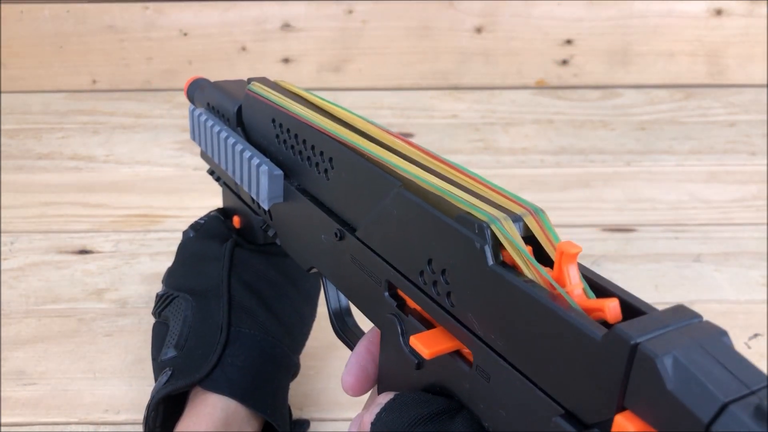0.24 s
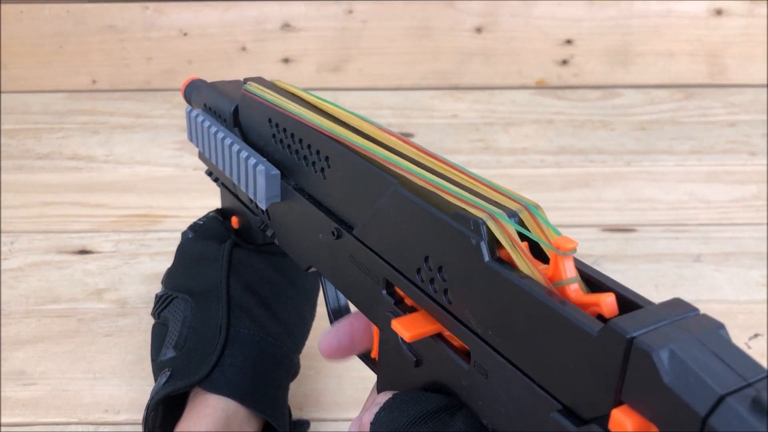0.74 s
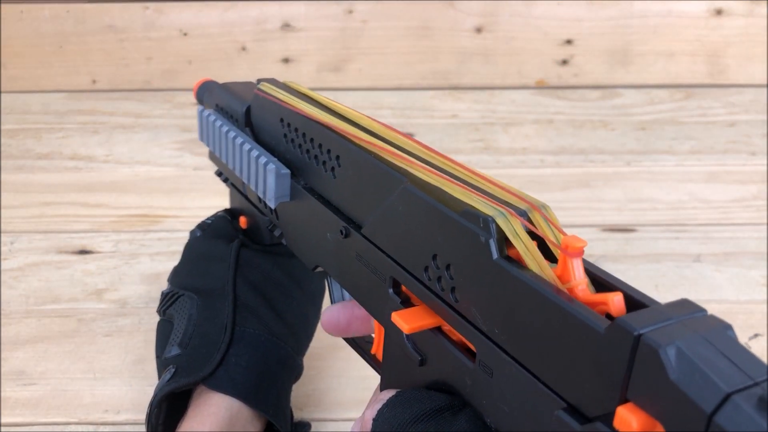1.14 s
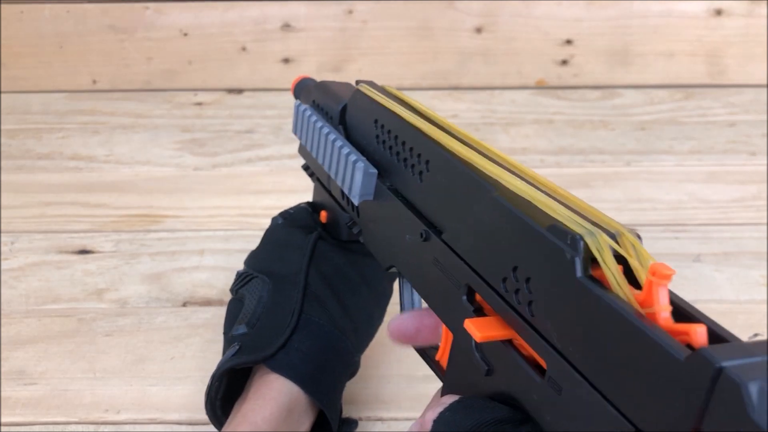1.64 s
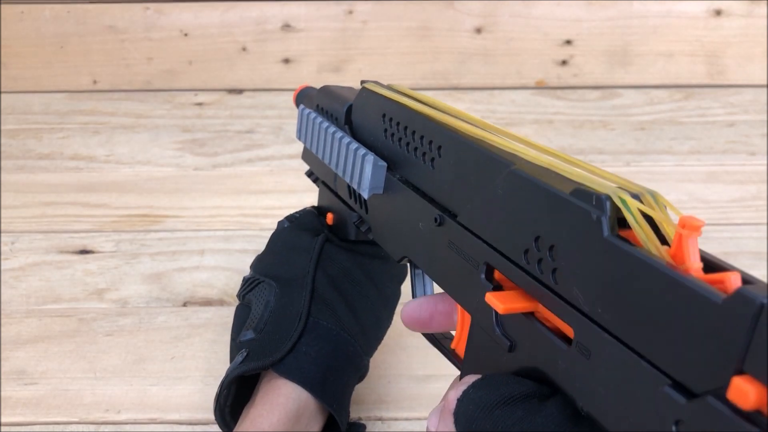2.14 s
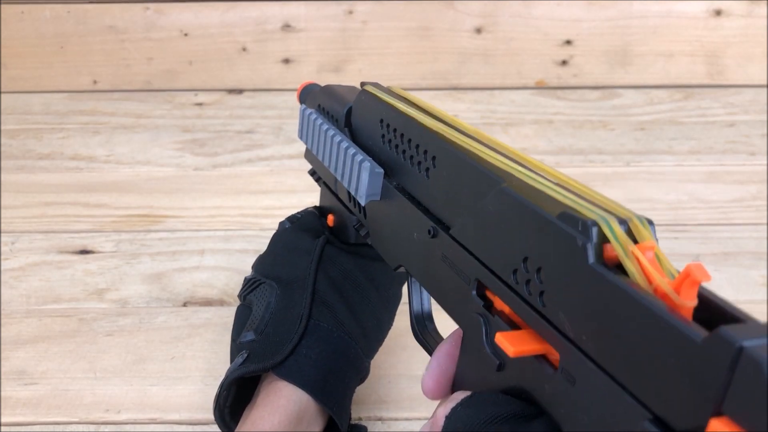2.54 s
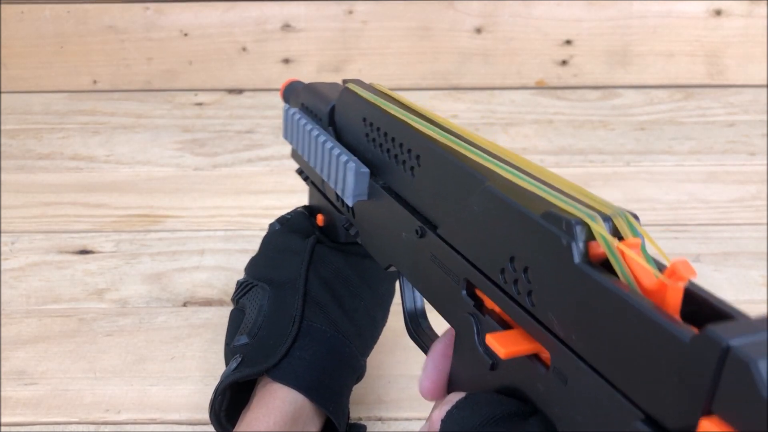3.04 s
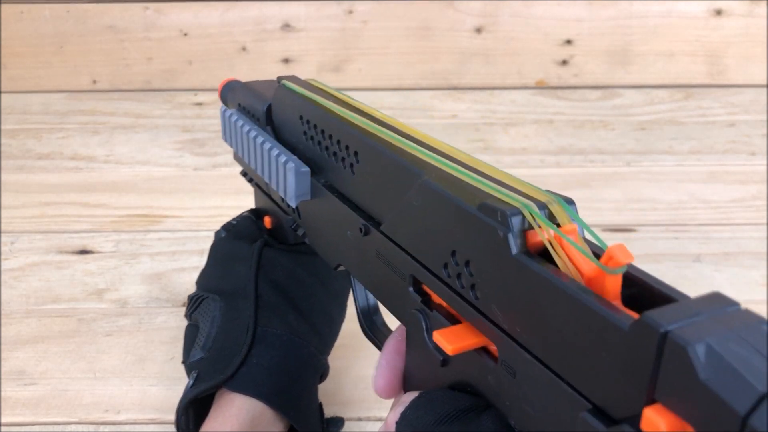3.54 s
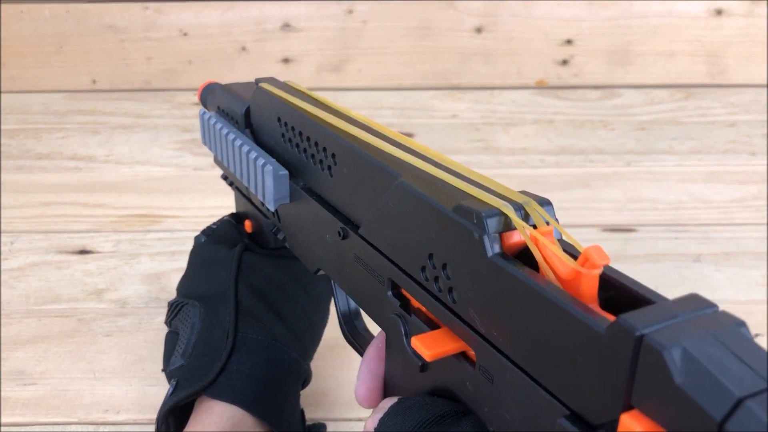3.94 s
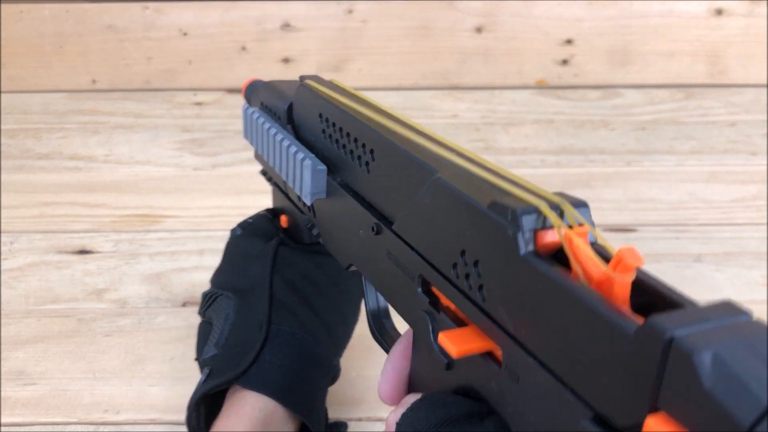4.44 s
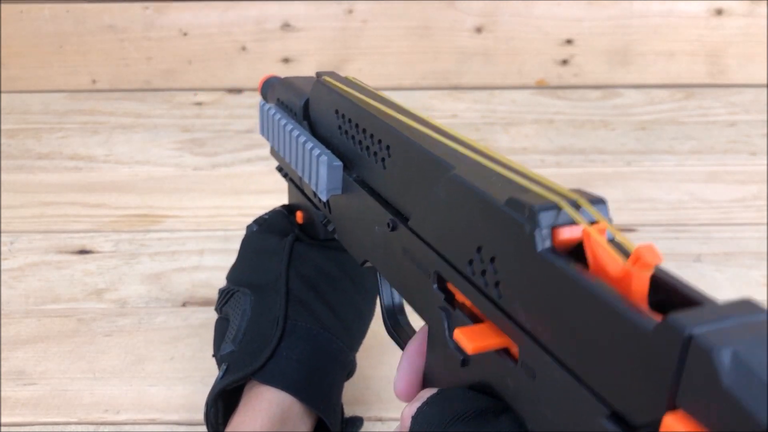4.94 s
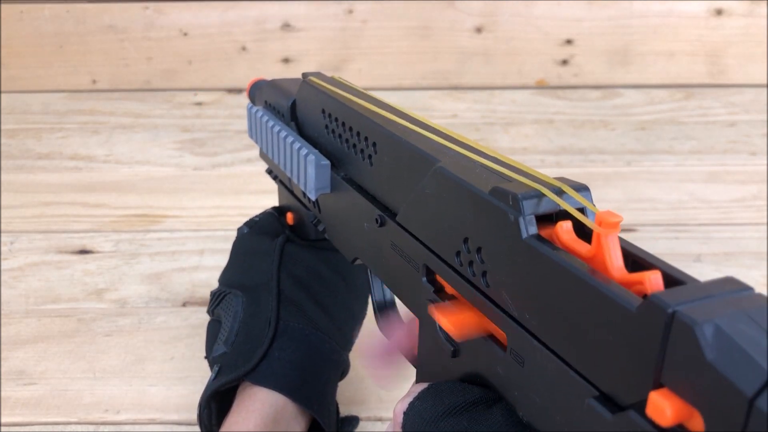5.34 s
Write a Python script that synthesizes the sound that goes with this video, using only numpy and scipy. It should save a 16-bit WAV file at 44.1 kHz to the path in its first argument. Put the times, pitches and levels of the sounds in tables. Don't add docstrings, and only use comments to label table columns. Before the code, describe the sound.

Eleven hard, bright snaps come from a toy band shooter close to the microphone, roughly half a second apart. Between them the trigger springs back with two sharp clicks and a faint metallic ringing, then nudges and clicks before the next shot. Softer hollow slaps land farther away. Short reflections show a small bare room; the low fan hum drops after the first shot and slowly creeps back.

```python
import sys
import numpy as np
from scipy import signal
from scipy.fft import rfft, irfft
from scipy.io import wavfile
from scipy.ndimage import uniform_filter1d

SR = 44100
rng = np.random.default_rng(int(sys.argv[2]) if len(sys.argv) > 2 else 0)


def boost_factor(decibels):
    exponent = np.asarray(decibels, float) / 20
    return 10 ** exponent


def to_wav(sig):
    pcm = np.clip(np.atleast_2d(sig), -1, 1) * 32767
    pcm = np.round(pcm).astype(np.int16)
    wavfile.write(sys.argv[1], SR, pcm.T)


N = 246959


def evened(x):
    return x / np.sqrt(np.mean(x ** 2) + 1e-20)


def read(points, hz):
    f, value = np.transpose(points)
    return np.interp(np.log(hz + 1), np.log(f + 1), value)


def add(mix, s, sound):
    part = mix[round(s * SR):][:len(sound)]
    part += sound[:len(part)]


def coloured(x, points):
    return irfft(rfft(x) * boost_factor(read(points, np.fft.rfftfreq(len(x), 1 / SR))), len(x))


def ring(modes, t):
    return sum(boost_factor(db - 60 * t / t60) * np.sin(2 * np.pi * hz * t) for hz, db, t60 in modes)


def gain_control_db():
    settle_db, fall_s, creep_db_per_s = -10.5, 0.01, 1.51
    since = np.maximum(np.arange(N) / SR - SNAPS[0][0], 0)
    fall = 1 - np.exp(-since / fall_s)
    return settle_db * fall + creep_db_per_s * since


# shaft_order, level_db
FAN_ORDERS = [(1, -4), (2, 1), (3, 3), (4, -5), (5, 5.5), (20, -9), (44.6, -7.5)]
# freq_hz, level_db
AIR = [(15, -43), (25, -8), (229, -22), (293, -27.5), (384, -27.5), (641, -26.5), (714, -36), (911, -22.5),
       (988, -34), (1610, -37), (2050, -29), (2220, -42.5), (16000, -23)]


def fan():
    level_db, shaft_hz = -48, 45.7
    turn = 2 * np.pi * shaft_hz * np.arange(N) / SR
    lines = np.zeros(N)
    for order, db in FAN_ORDERS:
        waver = evened(uniform_filter1d(uniform_filter1d(rng.standard_normal(N), 3000), 3000))
        phase = .25 * waver + 2 * np.pi * rng.random()
        lines += boost_factor(db + 1.5 * waver) * np.sin(order * turn + phase)
    air = evened(coloured(rng.standard_normal(N), AIR))
    air = coloured(air, [(33, -37), (42, 6.5), (150, -7.0), (220, 3.0), (3000, 0), (9000, -26.5)])
    return boost_factor(level_db + gain_control_db()) * (boost_factor(-14.0) * lines + boost_factor(-2.0) * air)


# delay_s, level_db
WALLS = [(0.0153, -13), (.0165, -16), (0.0212, -12), (0.0269, -13), (.031, -14), (0.036, -17), (.042, -17)]
# freq_hz, t60_s
ROOM_DECAY = [(250, 0.44), (660, 0.25), (1740, 0.33), (4590, 0.29), (12100, 0.23)]
# freq_hz, level_db
ROOM_COLOUR = [(300, -2.5), (1200, -1), (2500, -7), (5000, -9), (9000, -9.5), (15000, -10)]


def room(x):
    taps = np.zeros(SR)
    at = np.arange(0, SR - 8, 8)
    taps[at + rng.integers(0, 8, len(at))] = rng.choice([-1., 1.], len(at))
    hz, t, z = signal.stft(taps, SR, nperseg=256)
    t60 = read(ROOM_DECAY, hz)[:, None]
    decay = boost_factor(-60 * t / t60)
    adjoining = boost_factor(-21.5 - 60 * t / (2.74 * t60))
    tail = signal.istft(z * (decay + adjoining), SR, nperseg=256)[1][:SR]
    t = np.arange(len(tail)) / SR
    tail *= np.interp(t, [.002, .0115, .0145, .032], [.1, .11, .55, 1.1])
    tail /= np.linalg.norm(tail)
    for s, db in WALLS:
        add(tail, s, boost_factor(db) * np.ones(1))
    return signal.fftconvolve(x, coloured(tail, ROOM_COLOUR))[:N]


# start_s, thump_db, slap_db (re thump)
LANDINGS = [
    (0.968, -27.5, -31),
    (1.694, -25.5, 11),
    (1.983, -30, -16),
    (2.525, -19.5, -1),
    (3.089, -21.5, 7),
    (3.508, -18, 8.5),
    (3.98, -26, 6),
    (4.55, -22.5, 7),
    (5.033, -21, 5),
    (5.498, -20.5, 7),
]
# freq_hz, level_db, t60_s
BOX = [(161.7, -11.5, 0.23), (267, -4.5, 0.099), (320.3, 6.5, 0.039), (397.8, -5.5, 0.16), (491, 4, 0.041),
       (567, 0, 0.041), (747.6, -8, 0.098), (897, 2.5, 0.048)]
# freq_hz, level_db
CRACK = [(180, -74), (300, -30), (2400, -7), (3590, -6), (4100, -4), (4610, 0), (5640, -5.5), (9180, -7),
         (14700, -14.5), (16900, -40)]


def landings():
    out, t = np.zeros(N), np.arange(SR // 4) / SR
    for s, db, slap_db in LANDINGS:
        spot = boost_factor(1.5 * rng.standard_normal(len(BOX)))
        panels = sum(k * ring([mode], t + rng.random() / mode[0]) for k, mode in zip(spot, BOX))
        thump = panels * np.minimum(t / .006, 1) ** 2
        slap = coloured(rng.standard_normal(len(t)) * np.exp(-t / 0.0061), CRACK)
        thump /= np.abs(thump).max()
        slap /= np.abs(slap).max()
        add(out, s - .001, boost_factor(db) * (thump + boost_factor(slap_db) * slap))
    return out


# start_s, length_s, level_db
RUBS = [
    (0.143, 0.025, -44),
    (0.856, .022, -39.5),
    (1.424, 0.031, -37),
    (1.89, 0.02, -36),
]


def glove():
    swell_db, stop_s = -14, .008
    grit = boost_factor(4.0 * rng.standard_normal(N))
    grain = coloured(rng.standard_normal(N) * grit, [(500, -21), (900, 17.0), (2000, 10), (9000, -10)])
    t = np.arange(N) / SR
    strokes = np.zeros(N)
    for s, length, db in RUBS:
        swell = swell_db * np.maximum(1 - (t - s) / length, 0).clip(0, 1)
        stop = np.minimum(20 * np.maximum(t - s - length, 0) / stop_s, 200)
        strokes += (t > s) * boost_factor(db + swell - stop)
    return evened(grain) * strokes


def click(shell, low_db, length_ms, crack_db):
    t = np.arange(1024) / SR
    u = t / (max(length_ms, .3) / 1000)
    contacts = rng.standard_normal(len(t)) * boost_factor(2.47 * rng.standard_normal(len(t)))
    contacts *= u ** 2.93 * np.exp(-2.1 * u) + 0.14 * np.exp(-u / 3.53)
    shift = 1 + .015 * rng.standard_normal(len(shell))
    modes = [(hz * k, db, 2.2 / width) for (hz, width, db), k in zip(shell, shift)]
    body = evened(signal.fftconvolve(contacts, ring(modes, t))[:len(t)])
    sound = body + boost_factor(crack_db) * evened(coloured(contacts, CRACK))
    spectrum = rfft(contacts)
    flat = irfft(spectrum / np.abs(spectrum))
    spread = boost_factor(-7.0) * body + boost_factor(crack_db) * evened(coloured(flat, CRACK))
    shelf = [(1700, low_db + 17.5), (2300, 0)]
    sound, spread = (coloured(np.pad(v, (64, 0)), shelf) for v in (sound, spread))
    return np.array([sound, spread]) / np.abs(sound).max()


def strike(near, sent, rows, shell, low_db, room_db, crack_db):
    focus = 0.16
    usual_db = np.mean(rows, axis=0)[1]
    for k, (s, db, length_ms) in enumerate(rows):
        sound, spread = boost_factor(db + 3.5) * click(shell, low_db, length_ms, crack_db)
        add(near, s - .0017, sound)
        add(sent[k % 3], s - .0017, boost_factor(room_db - focus * (db - usual_db)) * spread)


# start_s, level_db, length_ms
GRIPS = [
    (.2075, -42, 0.33),
    (.3085, -44.5, 2.1),
    (.3545, -33, 1),
    (.3665, -66, .6),
    (.8415, -38.5, 1.8),
    (.862, -45, 2.1),
    (2.89, -46, 2.4),
]
# freq_hz, width_hz, level_db
GRIP_SHELL = [(1700, 500, -8), (3450, 70, -6), (3600, 500, 0), (5200, 600, -5)]


def grips(near, sent):
    strike(near, sent, GRIPS, GRIP_SHELL, -12, 3, 2.3)


# start_s, level_db, length_ms
TICKS = [(1.408, -50.5, 0.82), (1.885, -44.5, 1.3), (2.437, -39.5, 0.65), (2.938, -43, 1.2),
         (3.424, -41, 2.1), (3.432, -46, 1.5), (3.883, -35, 1.3), (3.89, -50, 1.5), (4.467, -34, 3.2),
         (4.959, -37.5, 1.4), (5.421, -34, 1.4)]
# freq_hz, width_hz, level_db
TICK_SHELL = [(1890, 83, -26), (3380, 500, -27), (4470, 190, 19)]


def ticks(near, sent):
    strike(near, sent, TICKS, TICK_SHELL, 0, 18.4, -7)


# start_s, level_db, length_ms
KNOCKS = [(0.609, -33.5, 0.84), (1.119, -32, 1.2), (1.699, -28, 1.4), (2.162, -45, 1.3), (2.738, -29, 1.9),
          (3.222, -24, 1.2), (3.712, -25.5, 1.23), (4.161, -21, 1.5), (4.744, -22.5, 1.75),
          (5.23, -17.5, 1.8)]
# freq_hz, width_hz, level_db
KNOCK_SHELL = [(1010, 230, -6), (1350, 300, -1), (1670, 210, 2), (2460, 500, -10)]


def knocks(near, sent):
    strike(near, sent, KNOCKS, KNOCK_SHELL, -22, -11, -8)


# start_s, level_db, length_ms
NUDGES = [(1.4356, -22.5, 1.8), (1.8962, -25.5, 3), (2.4479, -25, 2.7), (2.9482, -20.5, 4.8),
          (3.4358, -18.5, 2.4), (3.897, -17, 3.5), (4.4782, -17.5, 2.2), (4.9681, -15.5, 3.9),
          (5.4289, -16, 3.1)]
# freq_hz, width_hz, level_db
NUDGE_SHELL = [(1110, 150, -8), (3350, 460, -1), (3900, 940, 24), (7080, 320, 10), (8300, 180, 6),
               (12500, 660, -16), (14300, 330, -71)]


def nudges(near, sent):
    strike(near, sent, NUDGES, NUDGE_SHELL, -8, -9, 7.8)


# start_s, level_db, length_ms
PAWLS = [(0.8806, -18.5, 0.66), (1.4656, -17, 1.6), (1.922, -25, 1.3), (2.4714, -20, 1.3),
         (2.9692, -13.5, 1.4), (3.4574, -16.5, 1.9), (3.9126, -22, 2.5), (4.4965, -15, 3),
         (4.9853, -13.5, 1.26), (5.446, -13.5, 2)]
# freq_hz, width_hz, level_db
PAWL_SHELL = [(1740, 450, 26), (2860, 150, -41), (4280, 330, 9), (6230, 440, 21), (9500, 480, 46),
              (12500, 350, 30), (11300, 1200, 11)]


def pawls(near, sent):
    strike(near, sent, PAWLS, PAWL_SHELL, -11.5, -5, 11.4)


# start_s, level_db, length_ms
RETURNS = [(0.5593, -20, 0.55), (1.0816, -15.5, 0.88), (1.6547, -15.5, 1.8), (2.111, -17, 1.05),
           (2.6701, -16.5, 0.9), (3.1695, -14.5, 1.17), (3.6578, -11.5, 1.26), (4.1065, -11, 1.2),
           (4.6781, -11.5, 1.52), (5.1692, -9, 1.26)]
# start_s, level_db, length_ms
RESETS = [(0.5693, -12.5, 1.11), (1.0973, -10, 1.3), (1.6706, -14, 2), (2.135, -11.5, 1.3),
          (2.6988, -14.5, 2.08), (3.1935, -9, 1.24), (3.684, -10, 1.34), (4.1345, -9, 1.41),
          (4.703, -13, 1.37), (5.195, -9.5, 0.99)]
# freq_hz, width_hz, level_db
RETURN_SHELL = [(1480, 250, -8), (2080, 250, -9), (3500, 420, 0), (4500, 260, 0), (7500, 400, -9),
                (8900, 550, -8), (10900, 500, -11)]


def releases(near, sent):
    bounces = [(s + 0.004, db - 6.5, 1.77) for s, db, _ in RETURNS]
    strike(near, sent, RETURNS, RETURN_SHELL, -27, -8.5, -1)
    strike(near, sent, bounces, RETURN_SHELL, -15.5, -10, -1.5)
    strike(near, sent, RESETS, RETURN_SHELL, -24, 6.16, 1)


# freq_hz, level_db, t60_s
SPRING = [(4680, -29, 0.2), (4570, -28, 0.28), (4480, -28, 0.18), (1630, -33, 0.15), (2260, -35, 0.17),
          (2600, -33, 0.2), (3470, -31, 0.15)]


def spring(near, sent):
    level_db, room_db = -4.5, 7.5
    t = np.arange(SR // 2) / SR
    for s, db, _ in RETURNS + RESETS:
        coils = []
        for hz, mode_db, t60 in SPRING:
            bent_hz = hz * (1 + .006 * rng.standard_normal())
            coils.append((bent_hz, mode_db + 3 * rng.standard_normal(), t60))
        twang = boost_factor(db + level_db) * ring(coils, t)
        add(near, s, twang)
        add(sent[0], s, boost_factor(room_db) * twang)


# start_s, level_db, length_ms
SNAPS = [(0.3762, -6.5, 0.74), (0.9207, -8, 1.4), (1.4977, -9.5, 1.27), (1.9526, -8, 1.42),
         (2.4978, -6.5, 1.4), (2.988, -9, 1.9), (3.4771, -3.5, 1.09), (3.932, -6, 1.3),
         (4.5137, -5.5, 0.96), (5.001, -7.5, 2), (5.4607, -5, 1.36)]
# freq_hz, width_hz, level_db
SNAP_SHELL = [(1530, 850, -44), (3020, 130, 8.5), (3920, 310, 24.5), (5230, 100, -12), (5300, 210, 10),
              (6640, 460, 13), (7540, 300, 15), (9900, 110, 12.5)]


def snaps(near, sent):
    strike(near, sent, SNAPS, SNAP_SHELL, -15.5, 4.44, 7.4)


def gun():
    near, sent = np.zeros(N), np.zeros((3, N))
    for part in (grips, ticks, knocks, nudges, pawls, releases, spring, snaps):
        part(near, sent)
    return near, sent


def scene():
    near, sent = gun()
    far = landings()
    clicks = coloured(near + sum(room(x) for x in sent), [(300, -10.5), (650, -6), (1000, 1.0)])
    thumps = coloured(far + room(boost_factor(-7.5) * far), [(110, -27.0), (240, 0)])
    return (clicks + thumps + fan() + glove())[None]


def limiter(x):
    squeezed = 0.45 * np.tanh(x / 0.64) - 0.7 * x
    return 0.7 * x + coloured(squeezed, [(300, -40), (700, 0)])


def band_edge(x):
    edge_hz, attack_edge_hz, attack_db = 15850, 16800, 7.5
    below = coloured(x, [(edge_hz - 80, 0), (edge_hz + 160, -70)])
    above_curve = [(attack_edge_hz - 400, -3), (attack_edge_hz, -12), (attack_edge_hz + 150, -90)]
    above = coloured(x - below, above_curve)
    power = uniform_filter1d(above ** 2, 128) / (uniform_filter1d(above ** 2, 1200) + 1e-14)
    gate = uniform_filter1d(1. * (power > boost_factor(2 * attack_db)), 128)
    return below + gate * above


# centre_s, length_ms, band_hz, top_hz
THINNED = [
    (.972, 34, 650, 7800),
    (2.515, 20, 1200, 6400),
    (3.162, 16, 1900, 5200),
    (3.606, 18, 700, 8000),
    (4.033, 14, 600, 7200),
    (4.508, 8, 900, 6000),
    (4.586, 13, 2300, 5600),
    (5.252, 18, 900, 9000),
    (5.455, 8, 1300, 9000),
    (1.965, 6, 1500, 5500),
]


def thinned(x):
    out = x.copy()
    for s, length_ms, band_hz, top_hz in THINNED:
        size = round(1.3 * length_ms / 1000 * SR)
        fade = signal.windows.tukey(size, .75)
        piece = x[round(s * SR) - size // 2:][:size]
        z = rfft(piece * fade)
        step = round(band_hz * size / SR)
        low = round(550 * size / SR)
        bands = z[low:][:round(top_hz / band_hz - .5) * step].reshape(-1, step)
        size_of = np.abs(bands)
        strongest = size_of == size_of.max(axis=1, keepdims=True)
        kept = bands * strongest / size_of * np.linalg.norm(bands, axis=1, keepdims=True)
        kept *= boost_factor(3.0 * rng.standard_normal((len(kept), 1)))
        lines = np.concatenate([z[:low], kept.ravel(), 0 * z])[:len(z)]
        add(out, s - size // 2 / SR, fade * (irfft(lines, size) - piece))
    return out


def roll_off(x):
    return signal.sosfilt(signal.butter(12, 16970, fs=SR, output="sos"), x)


def record(dry):
    mix = thinned(band_edge(limiter(dry[0])))[None]
    return roll_off(mix)


dry = scene()
out = record(dry)
to_wav(out)
```